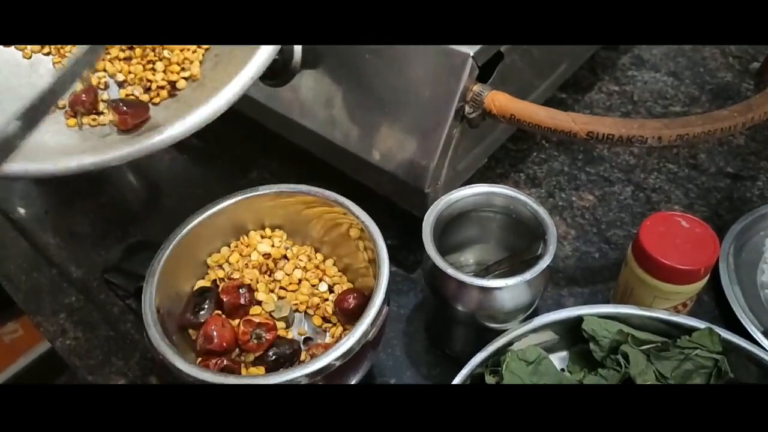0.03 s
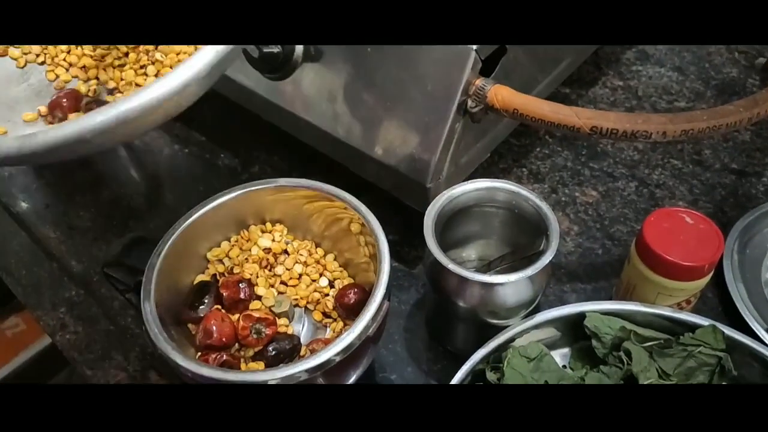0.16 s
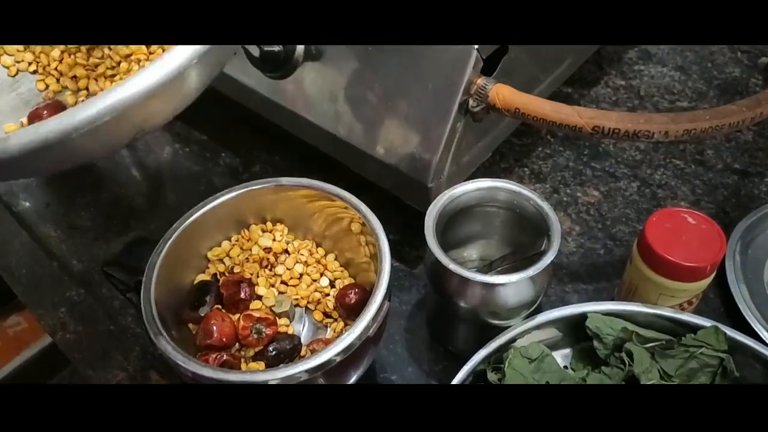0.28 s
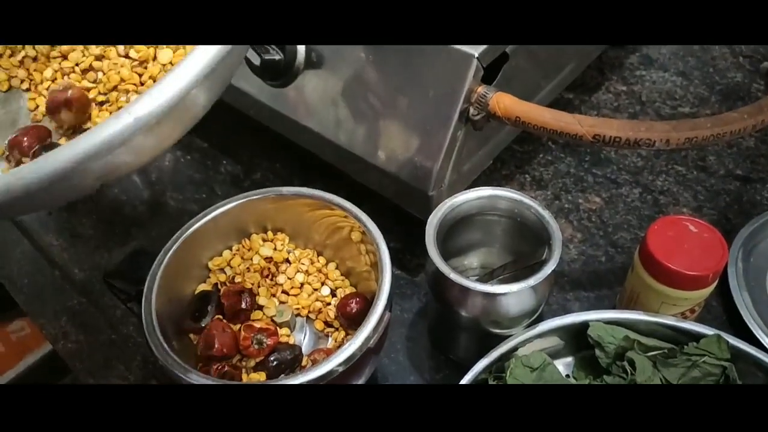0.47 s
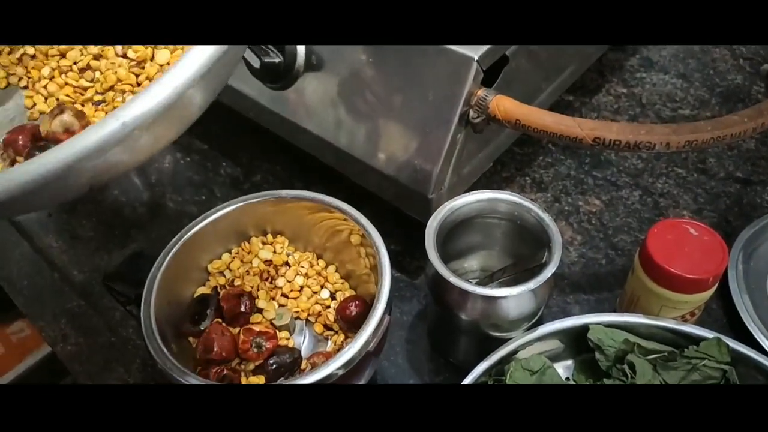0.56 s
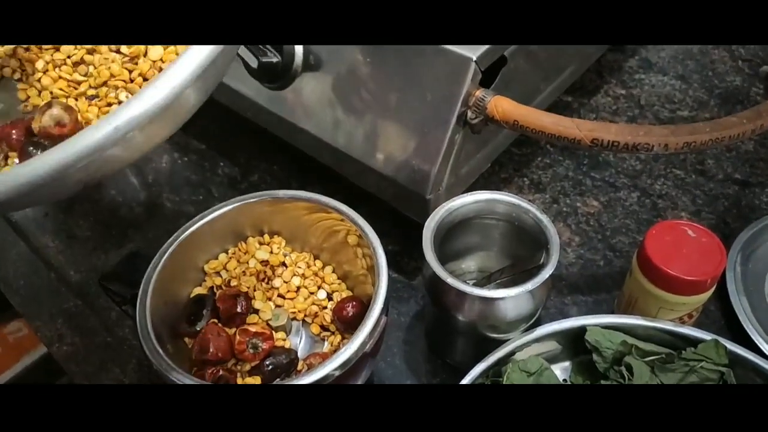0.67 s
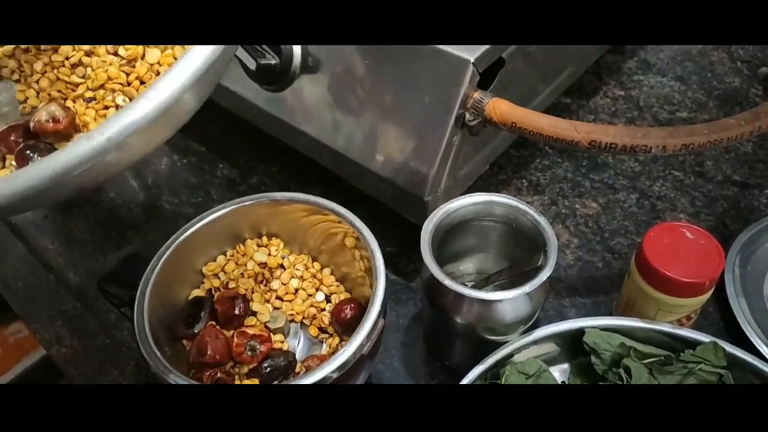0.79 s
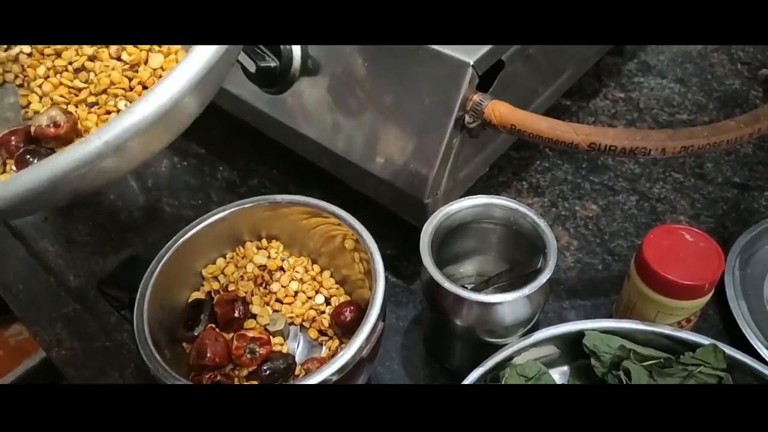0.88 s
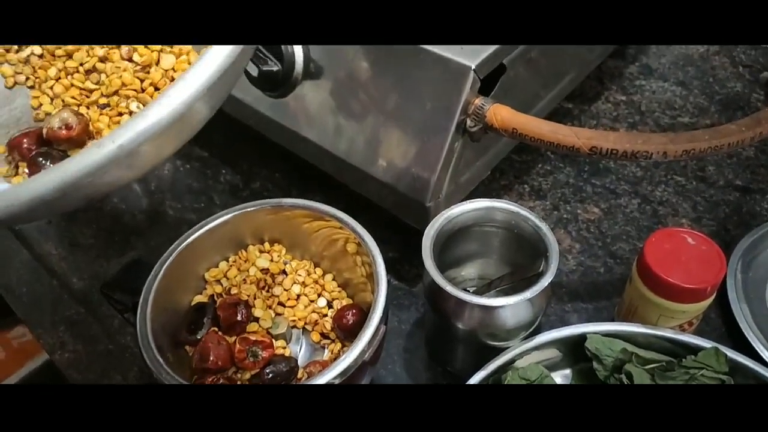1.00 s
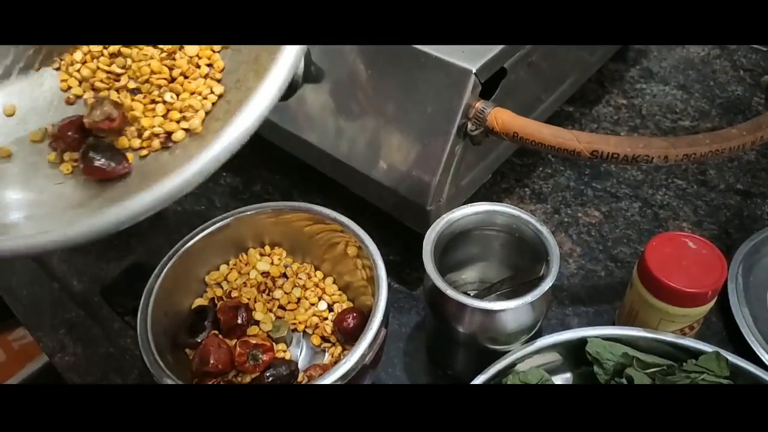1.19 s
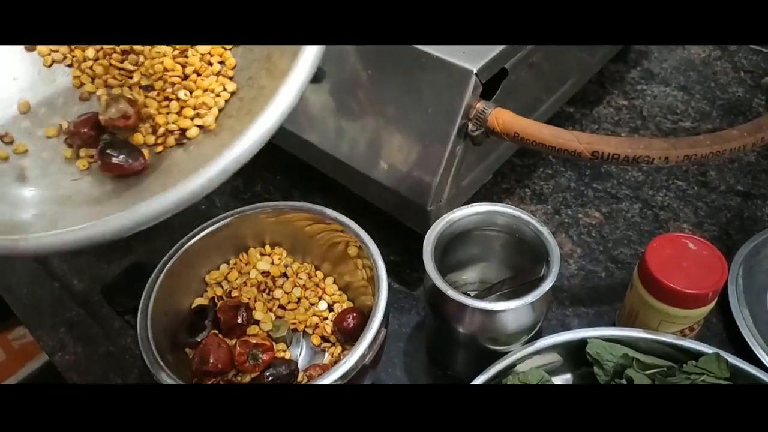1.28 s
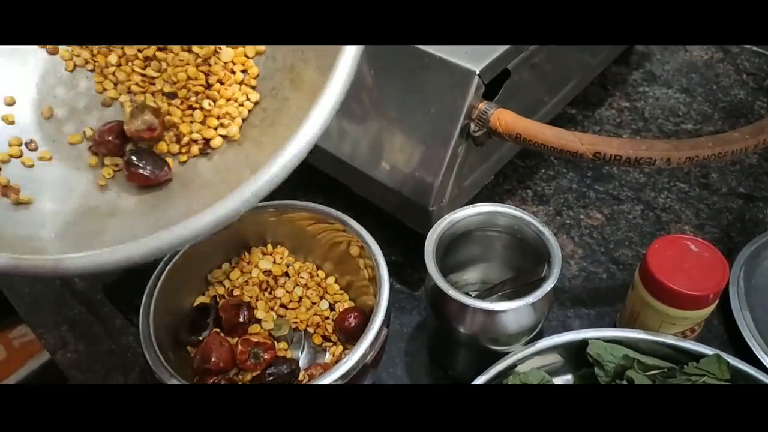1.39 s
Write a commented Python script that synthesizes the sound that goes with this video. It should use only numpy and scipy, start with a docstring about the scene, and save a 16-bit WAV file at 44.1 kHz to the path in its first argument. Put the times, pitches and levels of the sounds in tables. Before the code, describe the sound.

Dried lentils rattle and hiss in a thin metal pan, jolted by a heavy knock, then a lighter one

```python
"""A small hard kitchen: dry lentils and chillies shift in a tilted metal pan above a steel grinder jar.
Lentils are random collisions, coloured into hiss, rustle and drumming, that also excite the pan's modes.
Two sharp knocks, each a noise crack, a decaying wash and struck modes; lentils slide after the first.
Noise bursts make dull chilli bumps, bright lentil ticks before, during and after the slide, and a soft
early scuff. Steady coloured noise makes a faint low rumble."""
import sys
import numpy as np
from scipy import signal
from scipy.fft import rfft, irfft
from scipy.io import wavfile
from scipy.ndimage import uniform_filter1d

SR = 44100
rng = np.random.default_rng(int(sys.argv[2]) if len(sys.argv) > 2 else 0)


def dump(signal):
    """Clip the signal to [-1, 1] and save it as 16-bit WAV at the path in sys.argv[1]."""
    limited = np.clip(np.atleast_2d(signal).T, -1, 1)
    pcm = np.round(limited * 32767).astype(np.int16)
    wavfile.write(sys.argv[1], SR, pcm)


N = 63945
TIME_S = np.arange(N) / SR
LEFT_LAG_S = 0.0002886
CRACK_ATTACK_S, CRACK_HOLD_S, CRACK_T60_S = 0.00061, 0.003, 0.029


def from_db(db):
    """Converts dB to an amplitude factor."""
    return 10 ** (np.asarray(db) / 20)


def rms_one(x):
    """Scales a signal to rms 1 over all its channels."""
    return x / np.sqrt(np.mean(x ** 2) + 1e-20)


def unit_energy(x):
    """Scales each channel of an impulse response to energy 1."""
    return x / np.sqrt(np.sum(x ** 2, axis=1, keepdims=True))


def panned(left_minus_right_db):
    """Left and right gains, as a column."""
    return from_db(np.array([[left_minus_right_db], [-left_minus_right_db]]) / 2)


def per_bin(points):
    """Interpolates a frequency table over log frequency at every FFT bin."""
    hz, value = np.transpose(points)
    return np.interp(np.log(np.fft.rfftfreq(N, 1 / SR) + 1), np.log(hz), value)


def filtered(x, gain_db):
    """Applies a gain in dB to every bin."""
    return irfft(rfft(x) * from_db(gain_db), N)


# Likeness of left and right. Each row: frequency in Hz, correlation (no unit).
LIKENESS = [(40, 1), (140, 0.84), (400, 0.95), (700, 0.4), (1300, 0.19), (2500, 0.084), (10000, 0.051)]


def coloured(spectrum, source=None):
    """Colours two unrelated signals (default white noise), mixes them to stereo, lags the left; rms 1."""
    if source is None:
        source = rng.standard_normal((2, N))
    mid, side = rfft(source) * from_db(per_bin(spectrum))
    alike = np.clip(per_bin(LIKENESS), -.98, .98)
    mid = mid * np.sqrt(1 + alike)
    side = side * np.sqrt(1 - alike)
    lag = np.exp(-2j * np.pi * np.fft.rfftfreq(N, 1 / SR) * LEFT_LAG_S)
    return rms_one(irfft(np.array([(mid + side) * lag, mid - side]), N))


def envelope(start_s, attack_s, hold_s, t60_s):
    """Straight rise, hold, exponential decay by 60 dB per t60."""
    age_s = TIME_S - start_s
    decay_age_s = np.maximum(age_s - attack_s - hold_s, 0)
    return np.clip(age_s / attack_s, 0, 1) * np.exp(-np.log(1000) * decay_age_s / t60_s)


def ring(start_s, hz, t60_s, attack_s=CRACK_ATTACK_S):
    """One struck mode: a decaying sine whose phase lags on the left."""
    age_s = TIME_S - start_s - np.array([[LEFT_LAG_S], [0]])
    return np.sin(2 * np.pi * hz * age_s) * envelope(start_s, attack_s, 0, t60_s)


ROOM_T60_S, ROOM_GAP_S = 0.3, 0.0028


def kitchen(x):
    """Dense reflections from hard walls: convolution with decaying noise of unit energy."""
    echoes = rng.standard_normal((2, N)) * envelope(ROOM_GAP_S, ROOM_GAP_S, 0, ROOM_T60_S)
    return signal.fftconvolve(x, unit_energy(echoes), axes=1)[:, :N]


GRAINS_PER_S, GRAIN_SPREAD_DB = 6800, 3.5


def grains(per_s=GRAINS_PER_S):
    """Random tiny collisions of either sign, mostly weak, a few strong."""
    size_db = GRAIN_SPREAD_DB * np.minimum(rng.exponential(1, (2, N)), 5)
    impulses = from_db(size_db) * rng.choice([-1, 1], (2, N))
    return impulses * (rng.random((2, N)) < per_s / SR)


# Lentil slide. Each row: time in s, hiss in dB, 2-5 kHz rustle in dB, pan drumming in dB.
SLIDE_LEVELS = [(0, -49, -56, -61), (.08, -52.5, -61, -111), (0.161, -52, -48.5, -56.5),
                (0.238, -82, -64, -80), (0.338, -64, -58, -63), (.37, -39, -53, -27),
                (0.446, -21, -92, -42.5), (0.5, -24.5, -53, -36), (0.576, -24, -44.5, -35.5),
                (0.63, -17.5, -30.5, -33), (0.669, -21, -53, -48.5), (0.691, -58, -40.5, -52.5),
                (0.781, -52, -63, -52.5), (.9, -54, -108.5, -75), (0.998, -55.5, -80, -87),
                (1.04, -29, -57, -52), (1.15, -34.5, -77, -80), (1.21, -68, -66.5, -55.5),
                (1.359, -49, -52.5, -57.5), (1.45, -62, -53.5, -76.5)]
# Colours of hiss, rustle and drumming. Each row: frequency in Hz, relative density in dB per Hz.
HISS_COLOUR = [(1500, -49.5), (2800, -51.5), (4300, -39.5), (5200, -28), (6000, -17), (6500, -15.5),
               (7100, -4), (7600, -3.5), (8700, 0.5), (9900, 2.5), (11200, -3.5), (12200, -6), (13000, -10),
               (14200, -12), (15000, -20)]
RUSTLE_COLOUR = [(500, -31), (1400, -3), (1900, 2.5), (2250, 2), (2550, 3), (2750, -7.5), (3000, 3.5),
                 (3280, 1.5), (3450, -29), (3620, 8.5), (3850, 3.5), (4080, -0.5), (4400, 0), (4620, -7),
                 (4850, 4), (5600, -1), (8000, -9.5)]
DRUMMING_COLOUR = [(200, -63.5), (360, -20), (460, 4), (580, -1), (700, 7.5), (880, 4.5), (1130, -4.5),
                   (1380, 4.5), (1700, -15.5), (2300, -12.5), (5000, -60)]
# Pan modes. Each row: frequency in Hz, t60 in s, heavy knock in dB, light knock in dB (both before
# the knock filters), level under sliding lentils in dB relative to their hiss.
PAN_MODES = [(340.4, 0.23, -30.5, -42, -43.5), (611, 0.46, -28.5, -41, -49), (625, 0.23, -30, -25, -35.5),
             (670.7, 0.43, -25, -33.5, -46), (694, 0.35, -19, -39.5, -34.5), (803, 0.34, -26.5, -29, -50.5),
             (852, 0.35, -24.5, -29.5, -53), (854, 0.42, -31.5, -42, -39), (895.5, 0.2, -17.5, -33, -20),
             (1019, 0.35, -32.5, -36, -34.5), (1143, 0.11, -23, -51, -45.5), (1358, 0.47, -36, -24.5, -25),
             (1373, 0.51, -33, -27, -29.5), (2050, 0.084, -47, -16.5, -47), (2206, 0.15, -40, -32.5, -35),
             (3128, 0.23, -40.5, -34, -51.5), (3236, .07, -39.5, -44, -42.5), (3590, .2, -51.5, -48, -45),
             (3940, 0.19, -37.5, -37, -46.5), (4400, .07, -37, -52, -30.5), (4820, 0.35, -32.5, -46, -27.5),
             (5080, 0.33, -43.5, -44, -34.5), (5580, .08, -33.5, -52, -21.5),
             (6030, 0.14, -33.5, -33, -20.5), (6420, 0.13, -35, -24, -27), (6590, 0.18, -35.5, -34, -20.5),
             (6840, .11, -39, -43, -20), (8070, .3, -19, -49, -25), (8280, .35, -36.5, -21, -26),
             (8706, 0.23, -24.5, -42, -12.5), (9700, 0.35, -41, -25.5, -25.5), (9738, 0.2, -38.5, -45, -15),
             (10070, 0.23, -18.5, -34, -19), (10360, 0.19, -33.5, -46, -20.5)]
BOUNCES_PER_S, BOUNCE_DB = 370, -4  # harder bounces, relative to the other collisions
SLIDE_PAN_DB, SLIDE_ROOM_DB = -2.2, -4.5


def sliding_lentils():
    """Collisions hiss and rustle on the metal, drum on the pan's floor and keep its modes singing."""
    time_s, *levels_db = np.transpose(SLIDE_LEVELS)
    hiss_gain, rustle_gain, drum_gain = (from_db(np.interp(TIME_S, time_s, db)) for db in levels_db)

    pan = sum(from_db(db) * unit_energy(ring(0, hz, t60_s)) for hz, t60_s, _, _, db in PAN_MODES)
    singing = signal.fftconvolve(hiss_gain * rms_one(grains()), pan, axes=1)[:, :N]

    collisions = rms_one(grains()) + from_db(BOUNCE_DB) * rms_one(grains(BOUNCES_PER_S))
    hiss = hiss_gain * coloured(HISS_COLOUR, collisions) * panned(SLIDE_PAN_DB)
    rustle = rustle_gain * coloured(RUSTLE_COLOUR, grains())
    drumming = drum_gain * coloured(DRUMMING_COLOUR, grains())
    direct = hiss + rustle + drumming
    return direct + singing + from_db(SLIDE_ROOM_DB) * kitchen(direct)


WASH_ATTACK_S = 0.00084
TAIL_CONTRAST, GAP_T60_S = 0.58, 0.2  # depth factor of the spectral gaps, their emptying time


def ringing_out(wash, colour, start_s):
    """Gaps between resonances empty first, so the peaks stand out more as the ring ages."""
    colour_db = per_bin(colour)
    gap_db = np.minimum(colour_db - uniform_filter1d(colour_db, size=1600), 0)
    late = filtered(wash, TAIL_CONTRAST * gap_db)
    return late + (wash - late) * envelope(start_s, WASH_ATTACK_S, 0, GAP_T60_S)


# Knocks, heavy then light. Each row: start in s, crack in dB, wash in dB, wash t60 in s.
# Levels precede the knock filters.
KNOCKS = [(.3472, -4.5, -11, 0.35), (1.0124, -7, -16.5, 0.49)]
# Knock colours, heavy then light. Each row: frequency in Hz, relative density in dB per Hz.
KNOCK_COLOURS = [
    [(40, -24.5), (90, -12.5), (170, -1.5), (230, 0.5), (330, 8), (410, -7), (520, 8.5), (720, 9),
     (1000, 4), (1500, 0), (1800, -15.5), (2150, -13), (2600, -9), (2850, -13.5), (3050, -24.5),
     (3500, -19), (4400, -14), (4900, -9.5), (5500, -2), (5800, -12), (6100, -2.5), (6650, -2.5),
     (7050, -11.5), (7350, 4), (7900, 3), (8350, -3.5), (8750, 7), (9400, -1), (10200, 1.5), (11400, 0.5),
     (12500, -8.5), (13900, -7), (15200, -27)],
    [(40, -9), (130, -7.5), (250, -16), (480, -7.5), (680, -1), (900, 3), (1150, -10), (1370, 8),
     (1700, -8.5), (2050, -6.5), (2600, -13), (3150, -0.5), (3550, -11), (4200, -21.5), (4800, -2.5),
     (5100, -3.5), (5450, -15), (6200, -1), (7000, -8), (7650, 4.5), (8400, -8.5), (9200, 9.5), (9850, -7),
     (10450, 9.5), (11000, -3), (11600, -4), (12050, 5.5), (12800, -20), (13700, -4.5), (14500, -32),
     (15200, -20)],
]
# Crack tilts, heavy then light. Each row: frequency in Hz, gain in dB.
CRACK_TILTS = [
    [(150, 4), (600, -1), (1400, -1.5), (3000, 2), (9000, 1)],
    [(150, 3.5), (600, -1), (1400, -8.5), (3000, -3), (10000, 2)],
]
# Pan's brief heave under a blow. Each row: frequency in Hz, t60 in s, heavy knock in dB, light knock in dB.
# Levels precede the knock filters.
THUD_MODES = [(167, 0.12, -30, -35.5), (253, 0.083, -27, -41.5), (713, 0.016, -6.5, -22)]
# Knock radiation balance. Each row: frequency in Hz, left minus right in dB.
KNOCK_BALANCE = [(100, -13), (170, -2), (350, -0.5), (700, -1), (1400, 5), (3000, 1), (6000, 0),
                 (10000, -0.5), (14000, -2.5)]
BASS_SPLIT_HZ, BASS_T60_S = 385, 0.13
RING_SWELL_S = 0.0063  # the pan's ring takes a moment to fill the room
KNOCK_LOW_CUT_HZ = 138  # low cut that keeps the knocks free of deep bass


def knocks():
    """A blow cracks, excites a wash of crowded resonances whose bass dies first, and rings clear modes."""
    out = np.zeros((2, N))
    bass_filter = signal.butter(4, BASS_SPLIT_HZ, fs=SR, output="sos")
    for k, (start_s, crack_db, wash_db, wash_t60_s) in enumerate(KNOCKS):
        colour = KNOCK_COLOURS[k]
        crack = filtered(coloured(colour), per_bin(CRACK_TILTS[k]))
        crack_envelope = envelope(start_s, CRACK_ATTACK_S, CRACK_HOLD_S, CRACK_T60_S)
        out += from_db(crack_db) * crack * crack_envelope

        wash = ringing_out(coloured(colour), colour, start_s)
        bass = signal.sosfiltfilt(bass_filter, wash)
        upper_decay = (wash - bass) * envelope(start_s, WASH_ATTACK_S, 0, wash_t60_s)
        bass_decay = bass * envelope(start_s, WASH_ATTACK_S, 0, BASS_T60_S)
        out += from_db(wash_db) * (upper_decay + bass_decay)

        for modes, attack_s in ((PAN_MODES, RING_SWELL_S), (THUD_MODES, CRACK_ATTACK_S)):
            for hz, t60_s, *level_db in modes:
                out -= from_db(level_db[k]) * ring(start_s, hz, t60_s, attack_s)
    low_cut = signal.butter(2, KNOCK_LOW_CUT_HZ, "high", fs=SR, output="sos")
    out = signal.sosfilt(low_cut, out)
    return filtered(out, per_bin(KNOCK_BALANCE) * np.array([[1], [-1]]) / 2)


# Chilli bumps. Each row: start in s, level in dB.
TUMBLES = [(0.406, -31), (0.45, -33), (0.461, -51), (1.041, -43)]
# Bump colour. Each row: frequency in Hz, relative density in dB per Hz.
TUMBLE_COLOUR = [(120, -24), (250, -1), (320, 6.5), (430, -21)]
TUMBLE_ATTACK_S, TUMBLE_T60_S = 0.0046, 0.063


def tumbles():
    """Jolted chillies drop back on the pan after each knock: soft, dull bursts of noise."""
    bumps = sum(from_db(db) * envelope(start_s, TUMBLE_ATTACK_S, 0, TUMBLE_T60_S)
                for start_s, db in TUMBLES)
    return bumps * coloured(TUMBLE_COLOUR)


# Single lentils on metal. Each row: start in s, level in dB, left minus right in dB,
# room send in dB relative to the tick.
TICKS = [(0.026, -45.5, 4, -11), (0.1763, -32, -1.5, 3), (0.187, -35, 0.5, -2.5), (0.2118, -23, -3.5, -0.5),
         (0.2218, -28, 4.5, 6), (0.4444, -33, -2, -8), (0.466, -26.5, 5, -15), (0.605, -26, -12, -1),
         (0.614, -23.5, -6, -2), (0.62, -26.5, 3, 5), (0.712, -31, 7, 4.5), (0.87, -52, 4, -18),
         (1.1043, -26, -2, -1), (1.123, -30, -9.5, -3), (1.16, -30, -2.5, -1), (1.2523, -28.5, 0, -1),
         (1.3157, -30, -1.5, -2), (1.3448, -28.5, -1, 0), (1.3975, -33.5, -4, -2), (1.414, -36.5, -0.5, 1)]
# Tick colour. Each row: frequency in Hz, relative density in dB per Hz.
TICK_COLOUR = [(1000, -58), (3000, -31.5), (4000, -17), (4900, -9.5), (5700, -0.5), (8000, 6.5),
               (9300, 7.5), (11500, 0.5), (13500, -7), (15200, -14)]
TICK_ATTACK_S, TICK_HOLD_S, TICK_T60_S = 0.00059, 0.0036, 0.025


def ticks():
    """Stray lentils strike short bright bursts from the metal that hang in the room."""
    direct, room_send = 0, 0
    metal = coloured(TICK_COLOUR, grains())
    for start_s, db, pan_db, room_db in TICKS:
        burst = metal * envelope(start_s, TICK_ATTACK_S, TICK_HOLD_S, TICK_T60_S)
        tick = from_db(db) * panned(pan_db) * burst
        direct = direct + tick
        room_send = room_send + from_db(room_db) * tick
    return direct + kitchen(room_send)


# Scuff colour. Each row: frequency in Hz, relative density in dB per Hz.
SCUFF_COLOUR = [(750, -33.5), (950, -5), (1070, 0.5), (1200, -2), (1400, -33), (2000, -63)]
SCUFF_DB = -53.5
SCUFF_START_S, SCUFF_ATTACK_S, SCUFF_HOLD_S, SCUFF_T60_S = 0.005, 0.025, 0.02, 0.35


def scuff():
    """A faint hollow rub against the pan at the start: narrow-band noise that fades."""
    fade = envelope(SCUFF_START_S, SCUFF_ATTACK_S, SCUFF_HOLD_S, SCUFF_T60_S)
    return from_db(SCUFF_DB) * coloured(SCUFF_COLOUR) * fade


# Rumble colour. Each row: frequency in Hz, relative density in dB per Hz.
RUMBLE_COLOUR = [(20, 4), (45, -10), (90, -10.5), (150, -6), (260, -18.5), (600, -37), (2000, -70.5),
                 (12000, -42)]
RUMBLE_DB = -53.5


def rumble():
    """Steady noise weighted to the lowest frequencies."""
    return from_db(RUMBLE_DB) * coloured(RUMBLE_COLOUR)


def scene():
    """Lentils, knocks and chillies in the pan over the kitchen's rumble."""
    return sliding_lentils() + knocks() + tumbles() + ticks() + scuff() + rumble()


CLIP_LEVEL, CUTOFF_HZ = 1.3, 15400


def record(dry):
    """Rounds the loudest peaks, then cuts the top steeply."""
    rounded = CLIP_LEVEL * np.tanh(dry / CLIP_LEVEL)
    top_cut = signal.ellip(10, .1, 70, CUTOFF_HZ, fs=SR, output="sos")  # 0.1 dB ripple, 70 dB stop
    return signal.sosfilt(top_cut, rounded)


dry = scene()
out = record(dry)
dump(out)
```